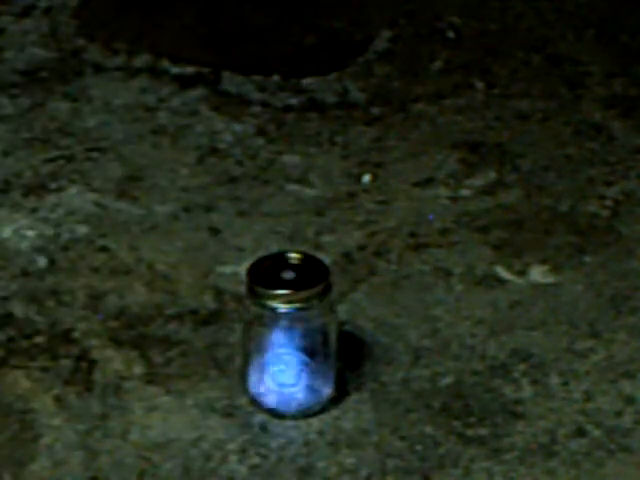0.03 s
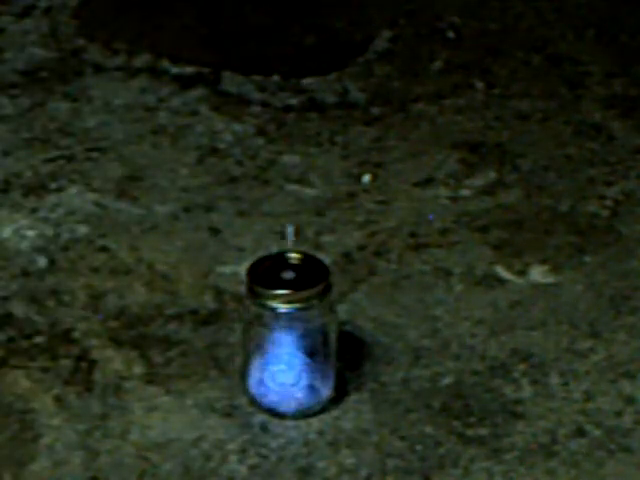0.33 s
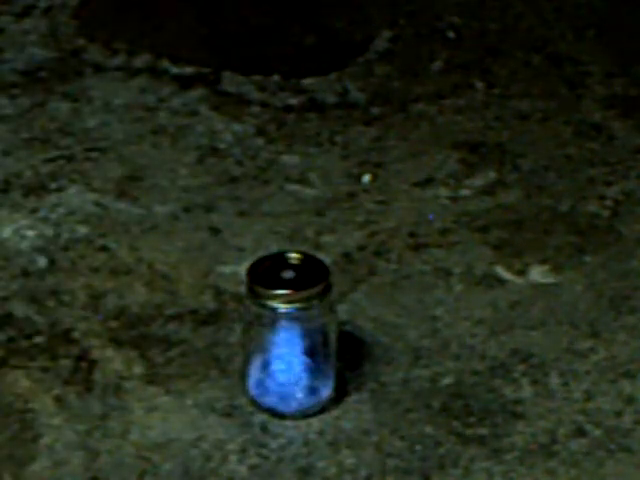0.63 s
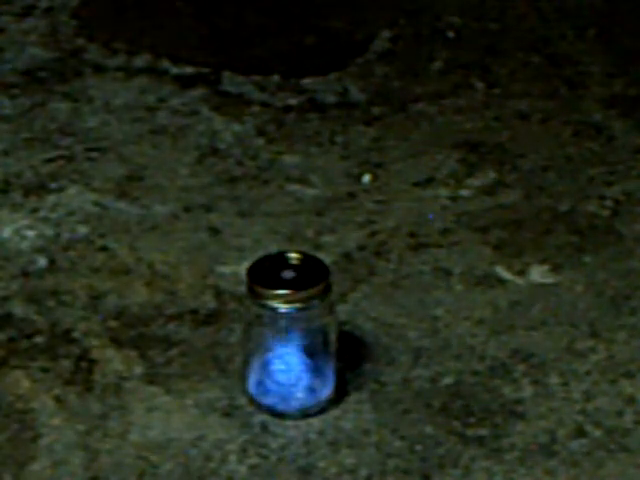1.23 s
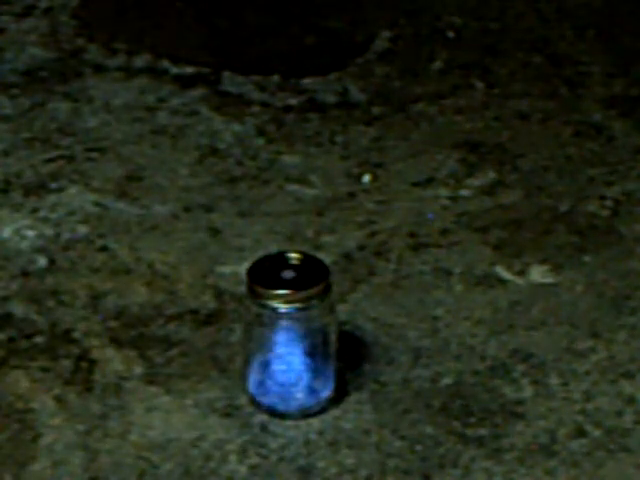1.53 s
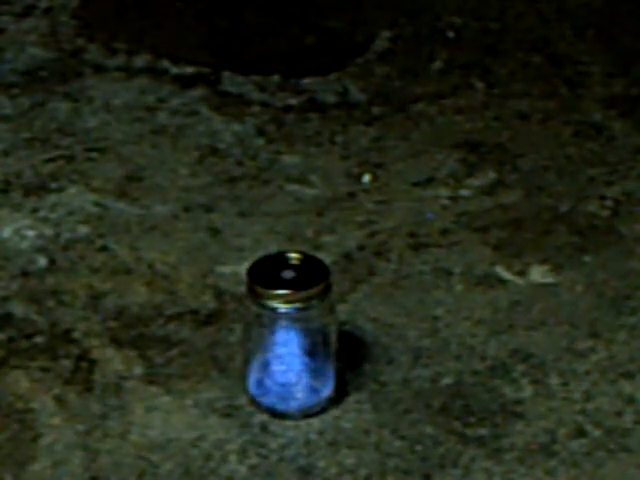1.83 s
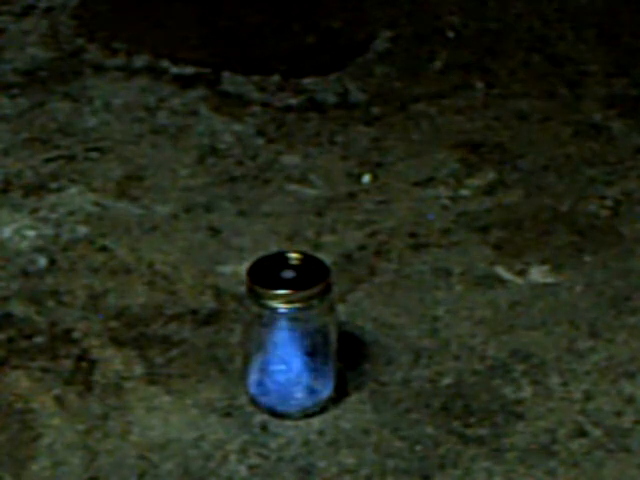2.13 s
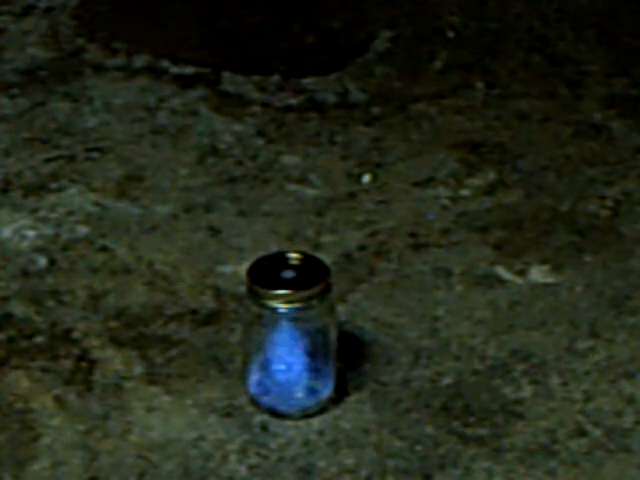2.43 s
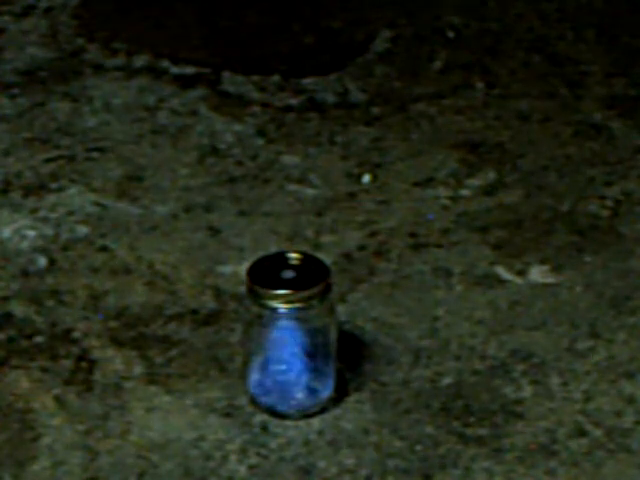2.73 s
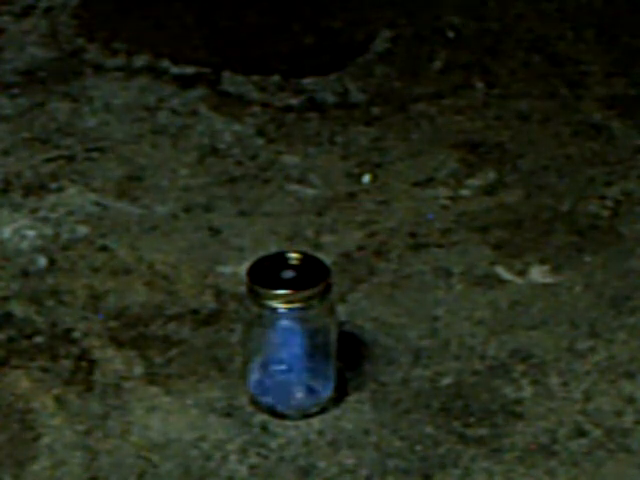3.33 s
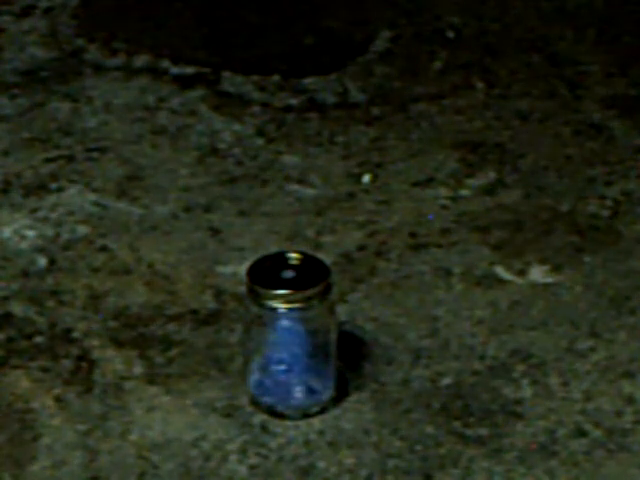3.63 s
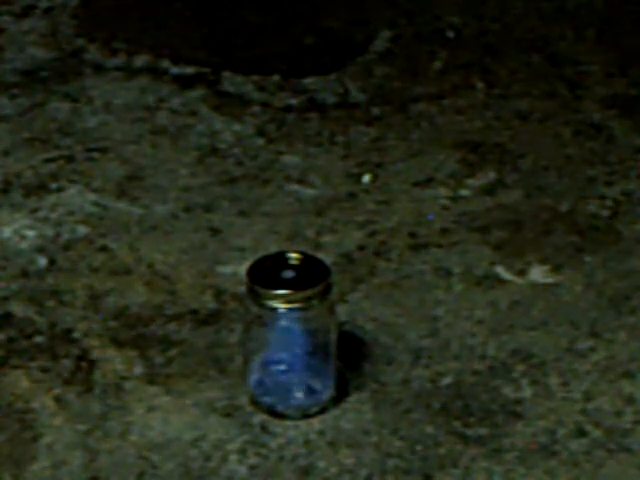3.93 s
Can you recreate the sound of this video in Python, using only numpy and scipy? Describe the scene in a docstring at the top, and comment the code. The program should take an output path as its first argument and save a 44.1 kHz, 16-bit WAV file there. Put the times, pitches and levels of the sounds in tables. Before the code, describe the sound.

A flame pulses in a small glass jar, opening with a whistling rush through the lid, then throbbing with a rough roar and faint spitting hiss. It slows and fades in a ringing room, its peaks overloading the microphone.

```python
"""In a ringing room, fuel burns in a small glass jar and puffs through a hole in the lid like a tiny pulse jet.
The puffs fuse into a low throb and drive a turbulent roar, a rasp and a spitting hiss. A whistling flare
opens the burn, and the flame gulps for air about eight times a second; near the end the gulping stops
and the puffs slow and fade. The loudest peaks overload the microphone."""
import sys
import numpy as np
from scipy import signal
from scipy.fft import rfft, irfft
from scipy.io import wavfile

SR = 44100
rng = np.random.default_rng(int(sys.argv[2]) if len(sys.argv) > 2 else 0)


def wav_record(signal):
    """Record a signal, one row per channel, as 16-bit PCM in the file named by sys.argv[1]."""
    frames = np.transpose(np.atleast_2d(signal))
    bounded = np.clip(frames, -1, 1)
    # unit amplitude maps onto the largest positive 16-bit level
    quanta = np.round(bounded * 32767).astype(np.int16)
    wavfile.write(sys.argv[1], SR, quanta)


N = 176400
T = np.arange(N) / SR
HZ = np.fft.rfftfreq(N, 1 / SR)
JITTER_HZ = 58  # how fast the timing and strength of the puffs waver
# unsteadiness of the burn (time [s], scale on jitter, flutter and drift [factor])
UNSTEADINESS = [(0, 1), (2.85, 1.1), (3.05, .5), (3.7, .7), (4, 1.8)]


def firing(sag_hz=6.5, jitter=0.016):
    """Running count of puffs: the rate sags in each gulp and is never quite even."""
    # pace of the burn before sag and jitter (time [s], rate [puffs/s])
    base_rate = [(0, 90.4), (.3, 88.3), (.8, 91), (.93, 84), (1.1, 86), (1.28, 86), (1.7, 90.4), (2.05, 87),
                 (2.4, 87), (2.85, 80.6), (3.0, 73.6), (3.2, 70.4), (3.42, 66), (3.55, 64), (3.75, 60.5),
                 (4, 68)]
    rate = curve(base_rate)[0] - sag_hz * gulping(lag_s=0.0029)
    unevenness = 1 + jitter * curve(UNSTEADINESS)[0] * wander(JITTER_HZ)
    return np.cumsum(rate * unevenness) / SR


def gulping(lag_s=0, width_s=.02):
    """Depth of the flame's gulps for air over time."""
    # each gulp (time [s], depth [factor])
    gulps = [(0.101, 1.005), (.201, 0.974), (0.336, 1), (0.47, 0.65), (0.643, 1.257), (0.755, 1.123),
             (0.855, 1), (1.029, .6), (1.124, 0.89), (1.205, 0.44), (1.346, .8), (1.5, 1.077), (1.619, .8),
             (1.739, 0.54), (1.855, 1.08), (1.981, 0.64), (2.065, 0.53), (2.147, 0.75), (2.232, 0.98),
             (2.36, 1.08), (2.455, 0.62), (2.615, 0.86), (2.72, 0.5), (2.876, 0.87)]
    return sum(depth * bell(T - lag_s, s, width_s) for s, depth in gulps)


def exhaust(cycles, sharpness=0.57, uneven_db=1.5):
    """One burst of outflow in each cycle, each of its own strength."""
    bursts = np.exp(sharpness * np.cos(2 * np.pi * cycles))
    return unit(bursts * amp(uneven_db * wander(JITTER_HZ)))


def throb(cycles, flutter_hz=19):
    """The low tone of gas pumping in and out of the jar; it hardens before each gulp, then chokes."""
    # base levels of the three lowest partials (time [s], first [dB], second [dB], third [dB])
    levels = [(0, -26.5, -16, -20), (.4, -31, -18, -17), (.54, -27, -17, -13.5), (.65, -28, -26, -20),
              (.8, -29, -17.5, -16), (.9, -25.5, -19, -27.5), (1.05, -29.5, -18, -15),
              (1.3, -28, -17.5, -13.5), (1.45, -31, -19, -20.5), (1.85, -28.5, -23, -20),
              (2.2, -30, -19, -15), (2.65, -27, -25.5, -27.5), (2.84, -29.5, -19, -19.5),
              (2.96, -26.5, -28, -28.5), (3.05, -19.5, -30.5, -24.5), (3.2, -23, -22, -21),
              (3.3, -23.5, -23, -36.5), (3.45, -24.5, -24.5, -24.5), (3.55, -29.5, -29.5, -23),
              (3.72, -28, -30, -24), (3.85, -32, -42, -40), (4, -36, -25.5, -29)]
    # how each partial moves (change in a gulp [dB], extra sag [Hz], lag of that change [s],
    # change before a gulp [dB], flutter [dB], phase drift [rad])
    motion = [(8, 9, -0.0086, -2.5, 0.3, 0.26), (-8, 0, -0.018, -0.5, .8, 0.12),
              (-11, 0, 0.016, 0.5, 1.5, 0.22)]
    gulp, before_gulp = gulping(), gulping(lag_s=-0.04)
    unrest = curve(UNSTEADINESS)[0]
    tone = np.zeros(N)
    for k, (base_db, moves) in enumerate(zip(curve(levels), motion), 1):
        gulp_db, sag_hz, lag_s, before_db, flutter_db, drift_rad = moves
        flutter = flutter_db * unrest * wander(flutter_hz)
        level = amp(base_db + gulp_db * gulping(lag_s) + before_db * before_gulp + flutter)
        phase = 2 * np.pi * (k * cycles - sag_hz * np.cumsum(gulp) / SR)
        drift = drift_rad * unrest * wander(flutter_hz)
        tone += level * np.sqrt(2) * np.cos(phase + drift)
    return tone


def roar(puffs):
    """The deep body of the turbulence, swelling with every puff."""
    # tone of the roar (frequency [Hz], relative level [dB])
    spectrum = [(20, -38.5), (40, -36), (62, -7), (100, -9.5), (135, -0.5), (180, 0), (208, -6.5),
                (285, 3.5), (320, 0), (336, -6), (352, 2.5), (400, -0.5), (440, -3), (490, -6.5),
                (560, -12.5), (680, -8), (900, -23.5), (2000, -67)]
    # its fade (time [s], relative level [dB])
    levels = [(0, -16), (.55, -15.5), (.68, -16.5), (1.1, -18.5), (1.55, -16), (1.95, -19.5), (2.15, -17.5),
              (2.45, -19), (2.87, -19.5), (3.3, -23), (3.55, -25.5), (4, -28.5)]
    return amp(curve(levels)[0] + 1.74) * turbulence(puffs, spectrum, steady=1.0, wet_db=0.5)


def rasp(puffs):
    """The midrange edge of the jet, its pulses smeared by the room."""
    # tone of the rasp (frequency [Hz], relative level [dB])
    spectrum = [(330, -8), (420, 1), (480, 1), (600, -3.5), (690, -5), (820, -0.5), (940, 1.5),
                (1020, -5.5), (1200, -7), (1300, -10.5), (1600, -14.5), (1800, -16), (2050, -23.5),
                (2700, -30), (5000, -45.5)]
    # its fade (time [s], relative level [dB])
    levels = [(0, -17.5), (0.57, -14), (0.68, -19.5), (1.35, -18), (1.98, -21), (2.12, -19.8), (2.3, -21.5),
              (2.87, -23.5), (3.3, -29.5), (4, -37)]
    return amp(curve(levels)[0] + 1.83) * turbulence(puffs, spectrum, steady=1.0, wet_db=8.0)


def flare(puffs, steady=4.2):
    """Gas shoots from the hole, whistling over a throaty rush: it builds, holds and cuts off."""
    # bright top of the flare (frequency [Hz], relative level [dB])
    top_spectrum = [(2800, -31), (3400, -12), (3750, -6.5), (3900, -1.5), (4030, -3), (4300, -5),
                    (4700, -12.5), (6300, -47.5)]
    # throaty rush under it (frequency [Hz], relative level [dB])
    rush_spectrum = [(500, -21), (800, -9), (1120, 3), (1300, -5.5), (1500, -7), (1800, -12), (3000, -28.5)]
    peak_s, end_s, rise_db_per_s, fall_db_per_s = 0.44, 0.573, 15.5, 167.5
    db = -rise_db_per_s * np.maximum(peak_s - T, 0) - fall_db_per_s * np.maximum(T - end_s, 0)
    top, rush = rng.standard_normal((2, N)) * (steady + puffs)
    return amp(db - 18) * colour(top, top_spectrum, whistle_db=10.5) + amp(db - 15) * colour(rush, rush_spectrum)


def hiss(puffs):
    """Gas hisses at the hole, pulsing with the puffs and crackling as the fuel spits."""
    # tone of the hiss (frequency [Hz], relative level [dB])
    spectrum = [(1000, -32.5), (2000, -13), (2800, -12), (3200, -7), (3700, -4.5), (4030, -0.5),
                (4400, -5.5), (5400, -14.5), (5750, -25), (6500, -56)]
    # its fade (time [s], relative level [dB])
    levels = [(0, -24.5), (0.559, -20.5), (.69, -30), (1.25, -29.6), (1.54, -29.5), (1.8, -32.5),
              (2.16, -31), (2.3, -35.5), (2.5, -33), (3.12, -36.5), (3.3, -42), (4, -47.5)]
    return amp(curve(levels)[0] + 0.24) * turbulence(puffs + spits(), spectrum, steady=0.25, wet_db=3.0)


def spits(per_s=53, decay_s=0.0011, size=1.4):
    """Brief random spikes in the flow where the fuel spits."""
    hits = (rng.random(N) < per_s / SR) * size * rng.uniform(.5, 1, N)
    return signal.lfilter([1], [1, -np.exp(-1 / (decay_s * SR))], hits)


def surging(width_s=0.025):
    """Gain of the jet as it briefly blows harder or falters."""
    # each surge or dip (time [s], level change [dB])
    surges = [(.39, -2.5), (.54, 1.5), (1.34, 1.5), (1.66, 2), (2.09, 2.5), (2.47, 4)]
    return amp(sum(db * bell(T, s, width_s) for s, db in surges))


def turbulence(puffs, spectrum, steady, wet_db):
    """Coloured noise that rides on a steady flow plus the puffs."""
    noise = rng.standard_normal(N) * lingering(steady + puffs, wet_db)
    return colour(noise, spectrum)


def lingering(strength, wet_db, t60_s=0.37):
    """The room holds the energy of each puff a little and fills the gaps between them."""
    decay = np.exp(-np.log(1e6) / (t60_s * SR))
    power = strength ** 2
    tail = signal.lfilter([1 - decay], [1, -decay], power - power.mean()) + power.mean()
    return np.sqrt(abs(power + amp(wet_db) ** 2 * tail))


def colour(noise, spectrum, whistle_db=0, whistle_hz=4000):
    """Shapes noise with a broad spectrum, the resonances of the room and the jar and any whistle of the hole;
    rms 1."""
    # resonances of the room and the jar (frequency [Hz], lift [dB])
    modes = [(415, 7.8), (458, 7), (509, 7.2), (532, 4.8), (554, 4.8), (589, 5.8), (624, 3.8), (701, 8.6),
             (744, 7.1), (797, 7.3), (842, 8.3), (911, 4.8), (946, 9.2), (980, 5.2), (1019, 8.6),
             (1061, 4.0), (1106, 6.9), (1168, 3.9), (1207, 12), (1237, 5.2)]
    knots_hz, knots_db = np.transpose(spectrum)
    broad = np.interp(np.log(HZ + 1), np.log(knots_hz), knots_db)
    room = sum(db * bell(HZ, hz, width=7.1) for hz, db in modes)
    whistle = whistle_db * bell(HZ, whistle_hz, width=7)
    return unit(irfft(rfft(noise) * amp(broad + room + whistle), N))


def amp(db):
    """Decibels to gain."""
    return 10 ** (np.asarray(db) / 20)


def unit(x):
    """Scales to rms 1."""
    return x / np.sqrt(np.mean(x ** 2) + 1e-20)


def bell(x, centre, width):
    """A smooth bump of height 1."""
    return np.exp(-((x - centre) / width) ** 2)


def curve(rows):
    """Each column of a time table, at every sample."""
    times, *columns = np.transpose(rows)
    return np.array([np.interp(T, times, c) for c in columns])


def wander(hz):
    """Smooth random motion of rms 1, up to about this frequency."""
    return unit(irfft(rfft(rng.standard_normal(N)) * bell(HZ, 0, hz), N))


def scene():
    """Throb, roar, rasp, hiss and flare all follow the same puffs."""
    cycles = firing()
    puffs = exhaust(cycles)
    body, edge, air = roar(puffs), rasp(puffs), hiss(puffs)
    return (throb(cycles) + body + air + surging() * (edge + flare(puffs)))[None]


def low_pass(x, hz, taps=511):
    """Band limit, steeper with more taps."""
    kernel = signal.firwin(taps, hz, window=("kaiser", 9), fs=SR)
    return signal.oaconvolve(x, kernel[None], "same")


def record(dry):
    """A narrow-band microphone squashes the loudest peaks; what still overshoots is clipped and crackles."""
    bass_hz, knee, headroom, ceiling = 45.8, .61, .14, .71
    x = signal.sosfilt(signal.butter(4, bass_hz, "high", fs=SR, output="sos"), dry)
    below_knee = np.clip(x, -knee, knee)
    squashed = below_knee + headroom * np.tanh((x - below_knee) / headroom)
    narrow = low_pass(squashed, hz=6020, taps=181)
    return low_pass(np.clip(narrow, -ceiling, ceiling), hz=15850)


dry = scene()
out = record(dry)
wav_record(out)
```